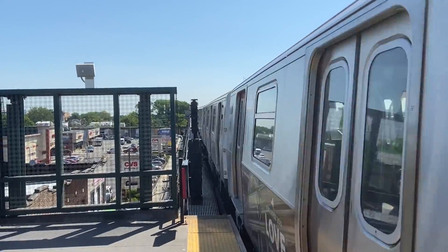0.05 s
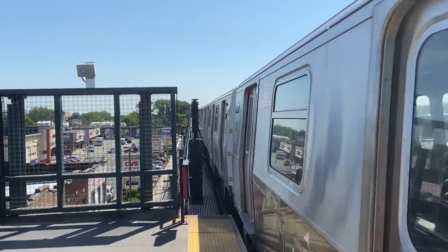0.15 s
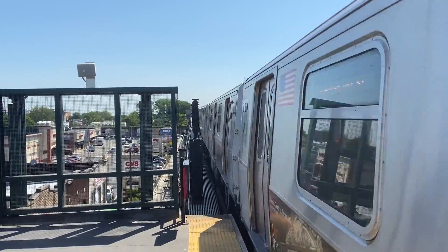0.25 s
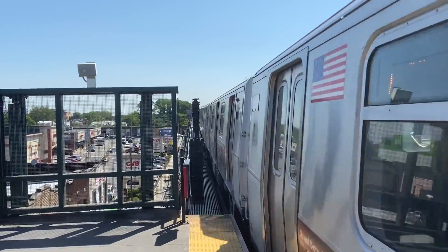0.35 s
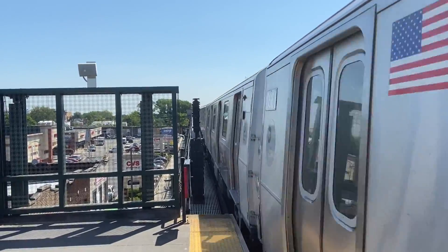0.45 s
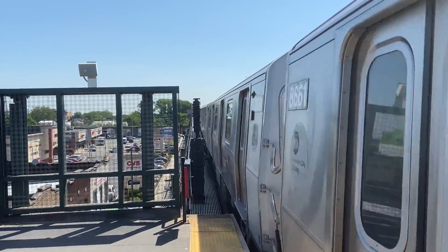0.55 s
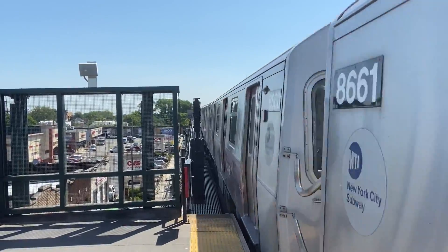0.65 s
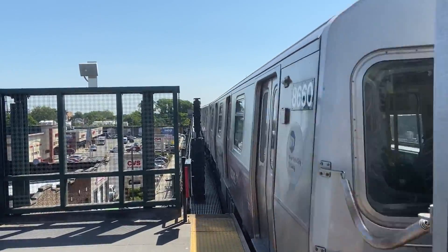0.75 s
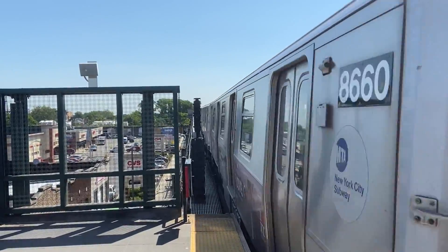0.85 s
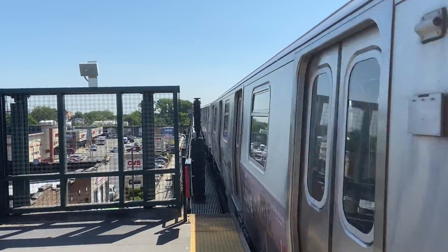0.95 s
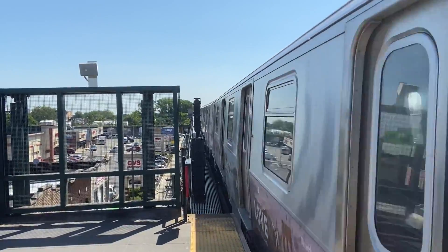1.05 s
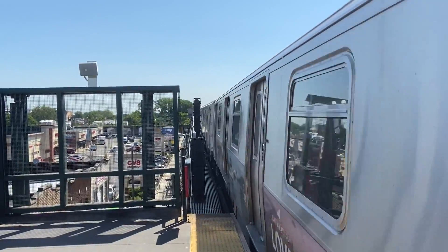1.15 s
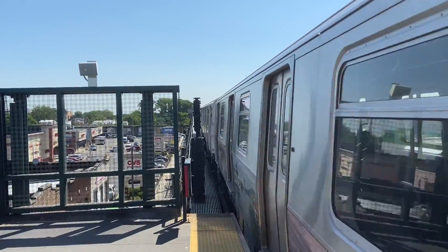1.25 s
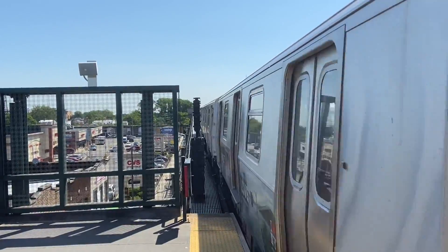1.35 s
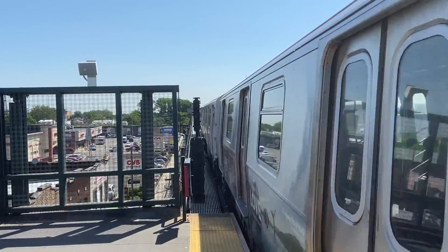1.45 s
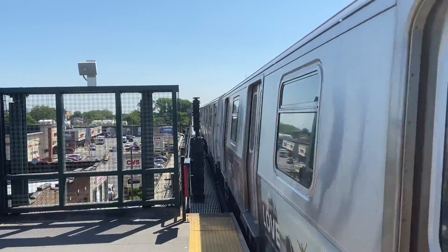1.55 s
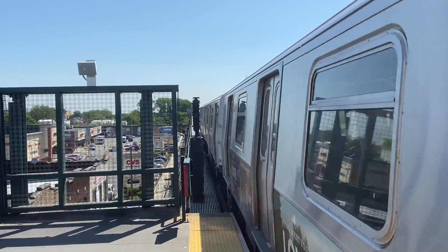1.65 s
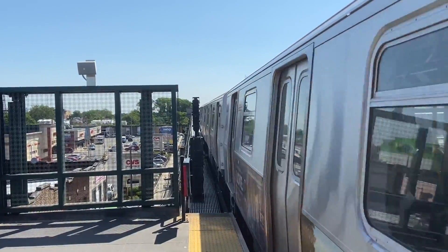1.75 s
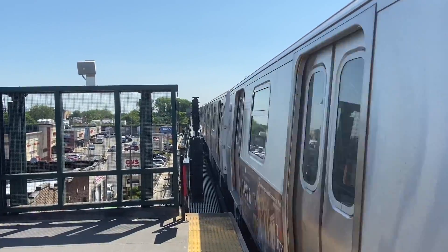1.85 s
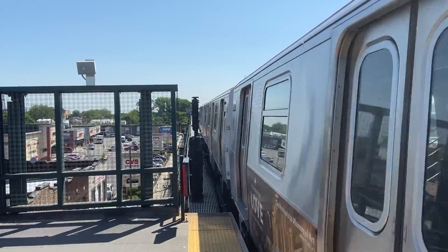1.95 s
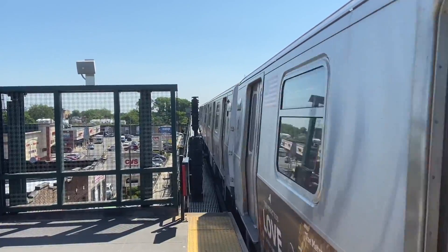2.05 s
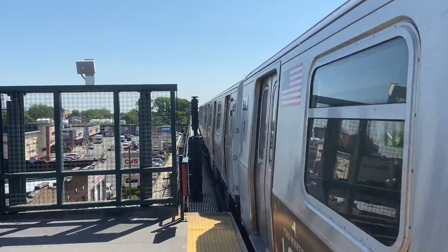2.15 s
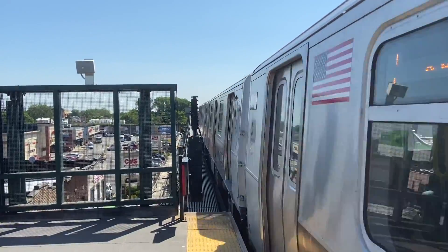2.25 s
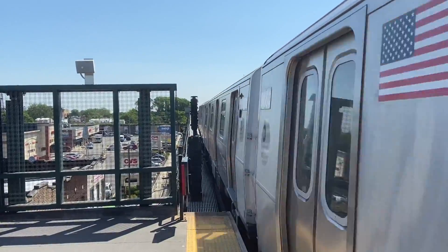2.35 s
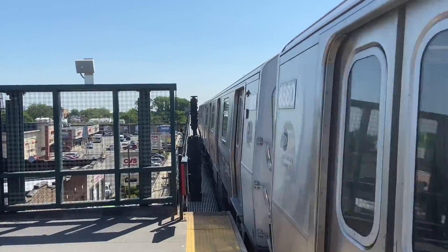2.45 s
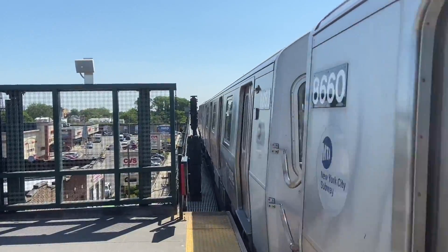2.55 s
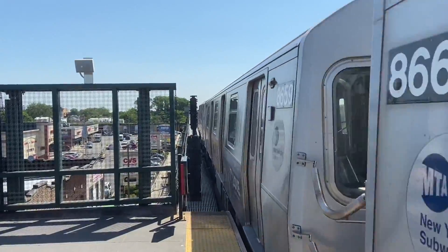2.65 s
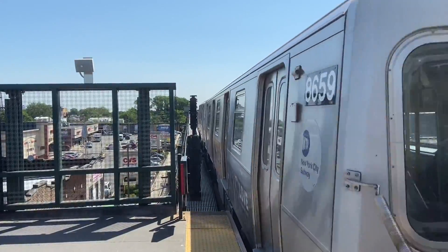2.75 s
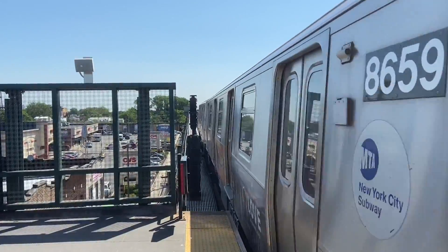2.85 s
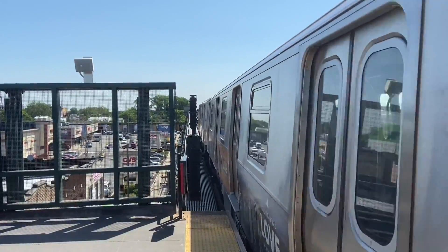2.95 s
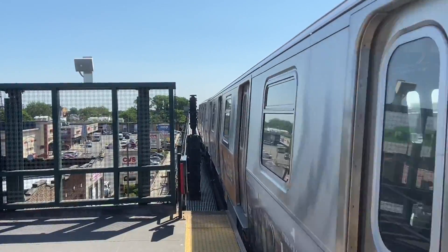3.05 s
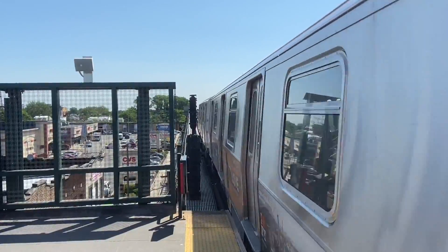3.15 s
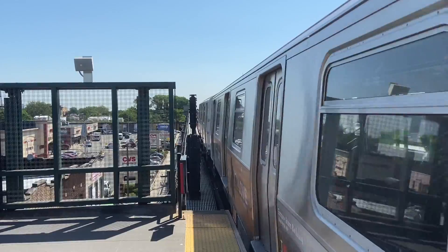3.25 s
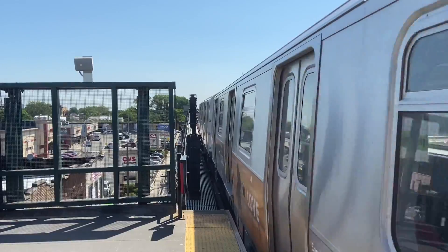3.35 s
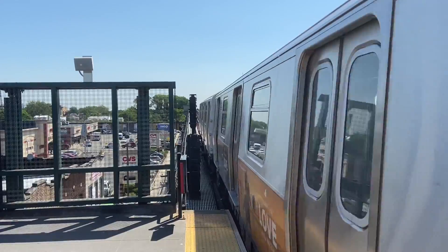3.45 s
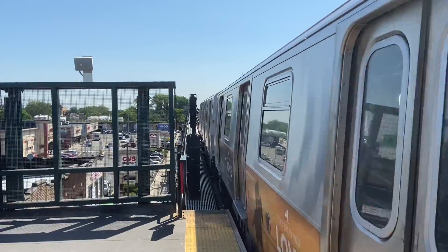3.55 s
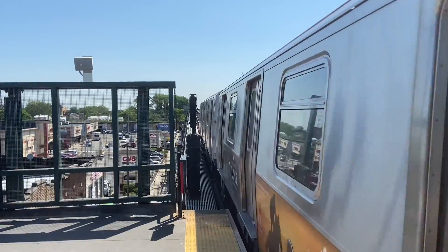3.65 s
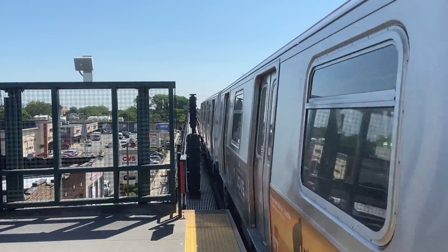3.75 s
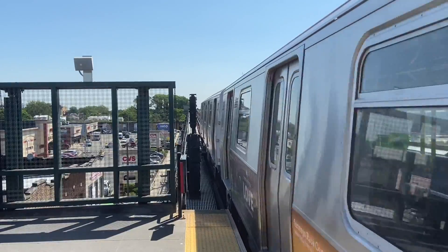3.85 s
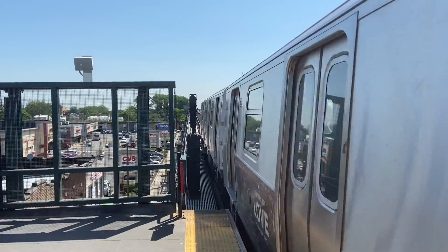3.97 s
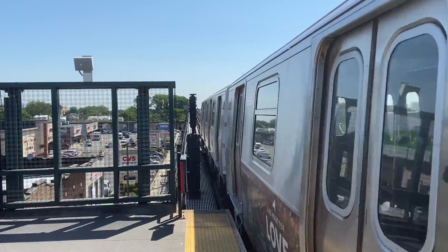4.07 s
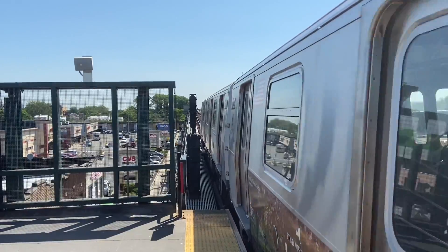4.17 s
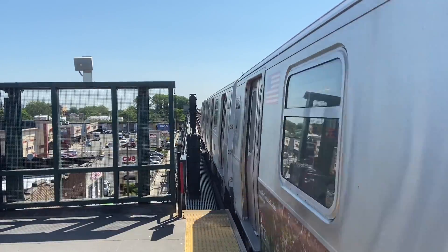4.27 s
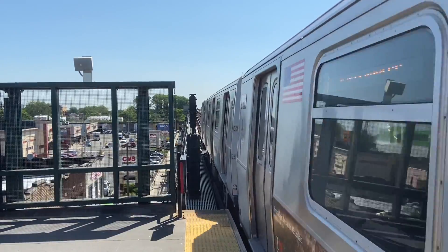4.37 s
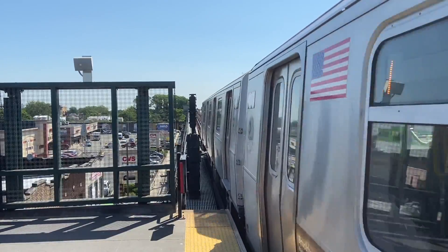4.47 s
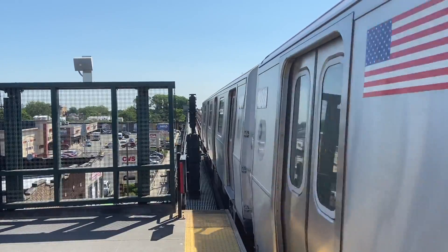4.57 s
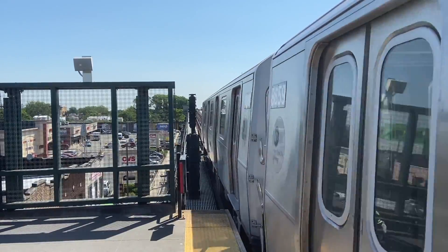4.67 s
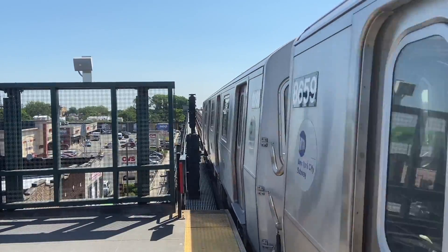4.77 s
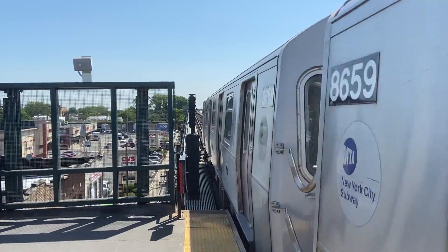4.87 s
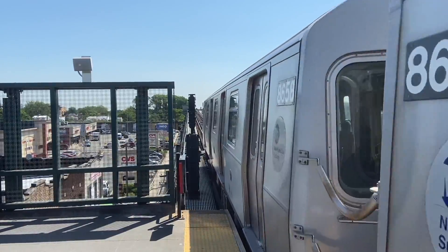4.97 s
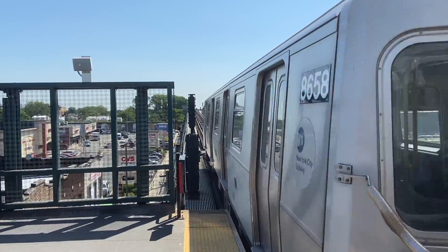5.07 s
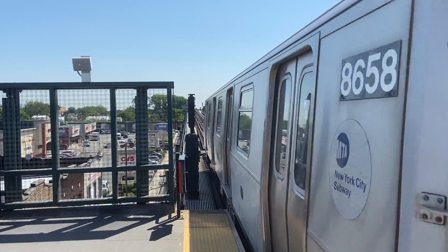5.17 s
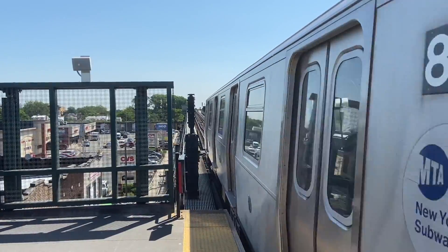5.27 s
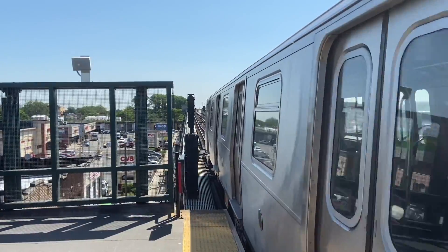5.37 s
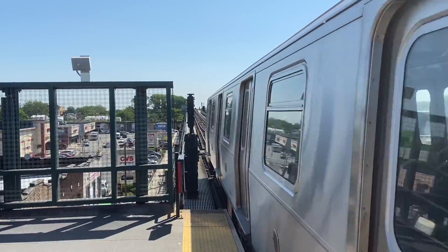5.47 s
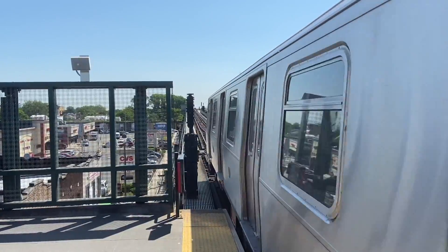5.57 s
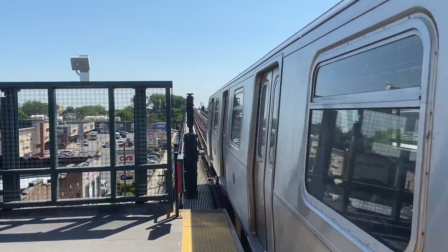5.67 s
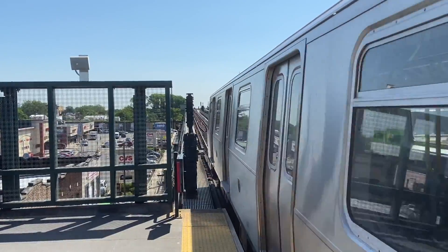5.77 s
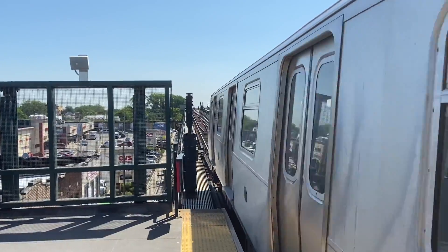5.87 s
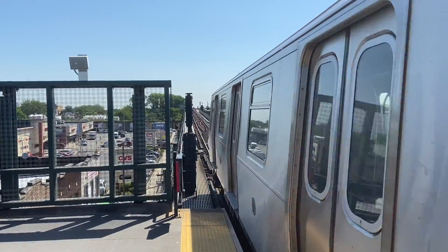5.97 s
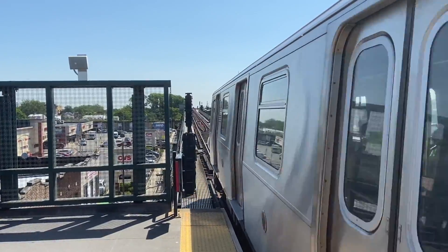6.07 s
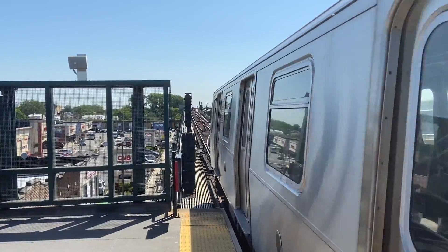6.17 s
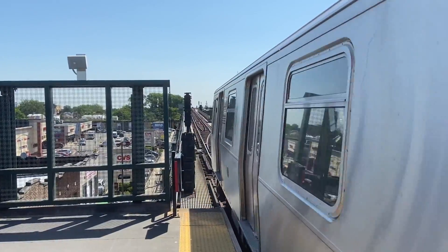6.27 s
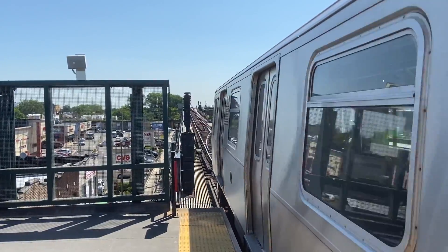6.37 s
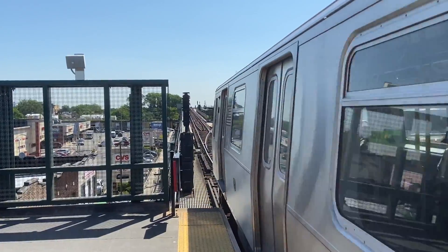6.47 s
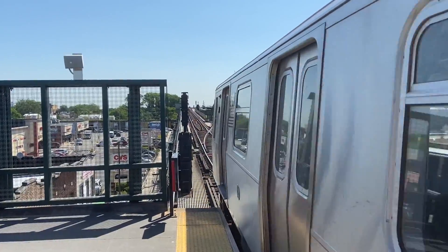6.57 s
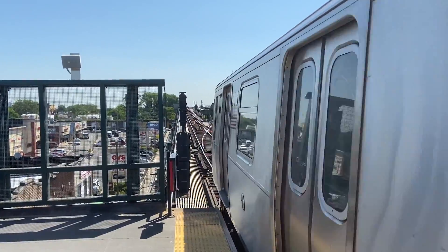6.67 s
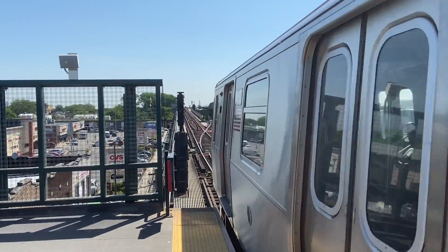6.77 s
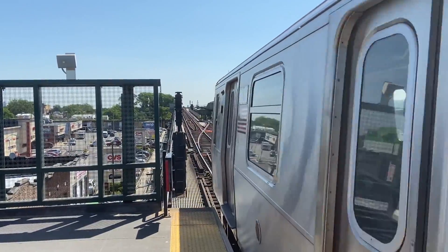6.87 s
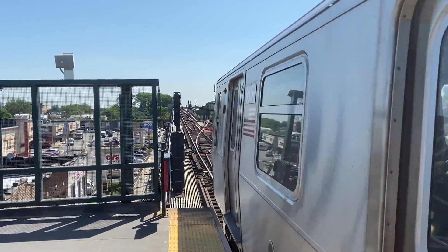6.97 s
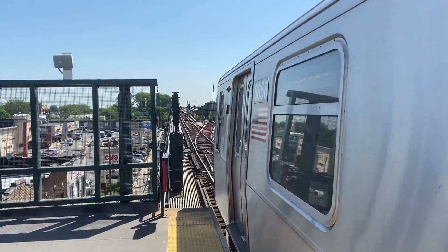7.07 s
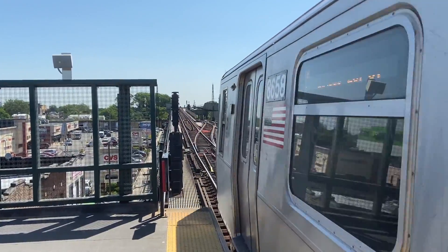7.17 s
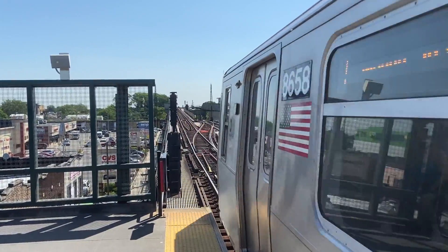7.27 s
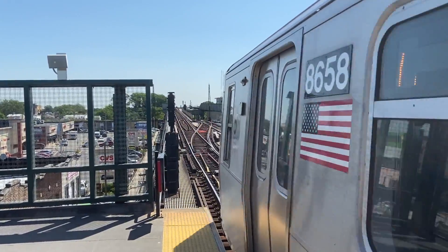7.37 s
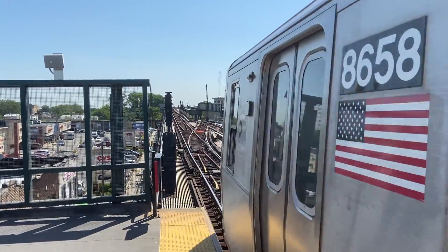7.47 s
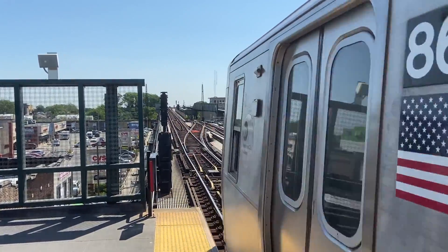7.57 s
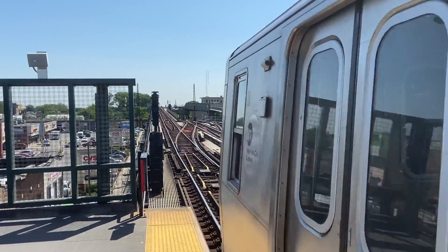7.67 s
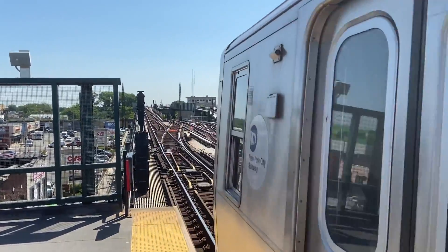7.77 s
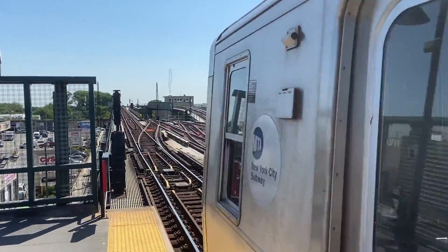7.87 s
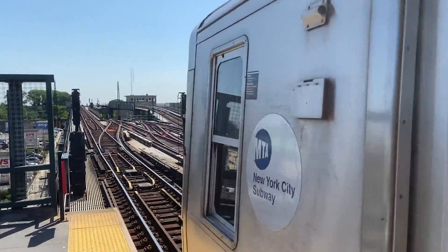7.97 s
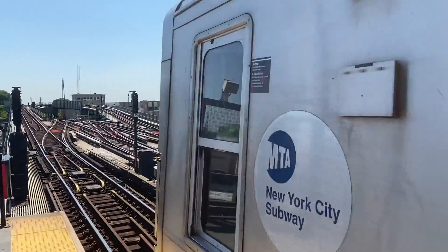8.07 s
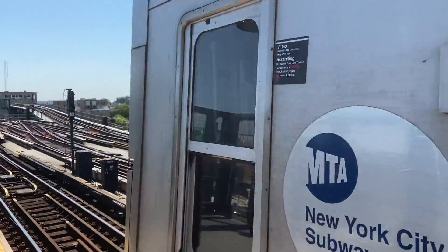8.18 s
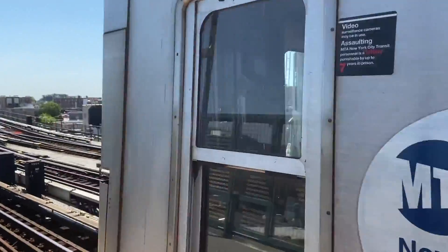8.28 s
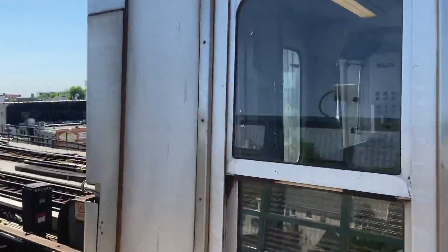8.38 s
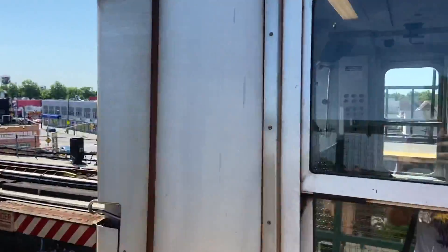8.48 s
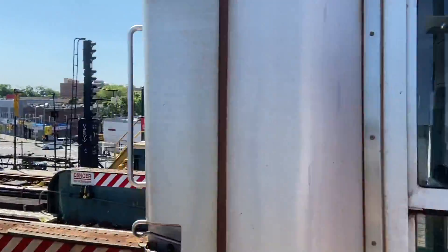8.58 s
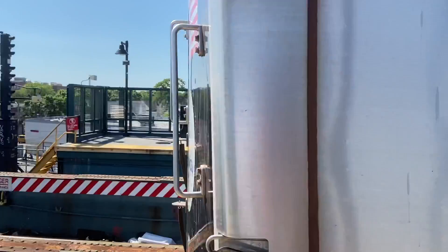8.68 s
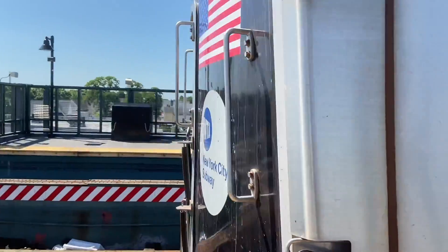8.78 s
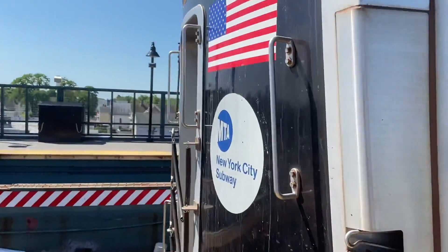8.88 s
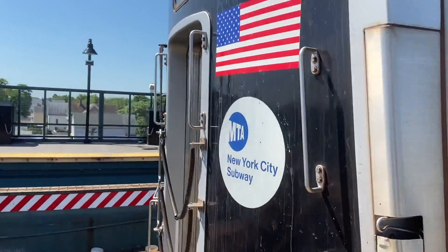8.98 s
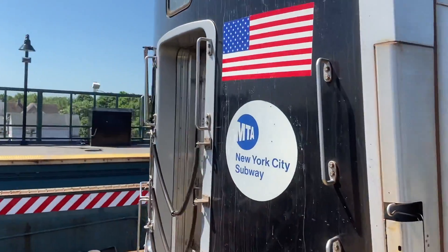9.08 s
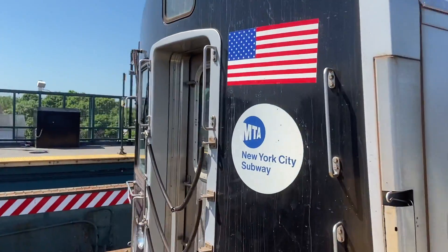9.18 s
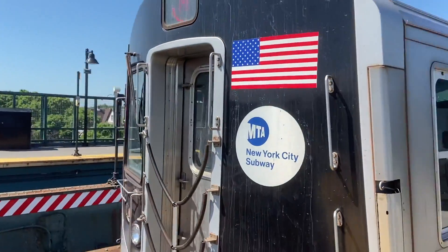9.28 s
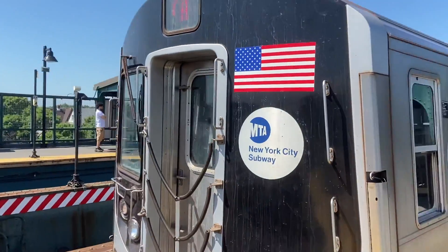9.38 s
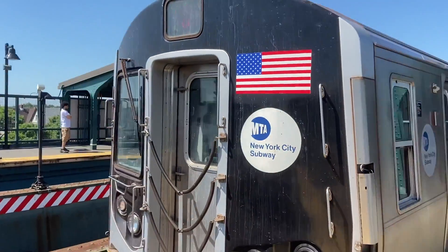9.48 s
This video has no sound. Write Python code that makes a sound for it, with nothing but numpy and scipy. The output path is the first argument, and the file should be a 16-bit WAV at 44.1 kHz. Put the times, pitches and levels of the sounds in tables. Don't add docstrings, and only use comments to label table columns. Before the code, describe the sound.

Close beside an outdoor elevated platform, a long steel train rumbles past. Hard clanking bangs come in irregular clusters over rail joints and switches, shaking the deck and ringing briefly. A fuzzy electric whine shifts between two close pitches. The train slows, bangs grow sparse, and the end is quieter rolling with whine and a faint high brake squeal. Wide stereo, near microphone.

```python
import sys
import numpy as np
from scipy import signal
from scipy.fft import rfft, irfft, next_fast_len
from scipy.io import wavfile
from scipy.ndimage import uniform_filter1d, map_coordinates

SR = 44100
rng = np.random.default_rng(int(sys.argv[2]) if len(sys.argv) > 2 else 0)


def field_ratio(decibels):
    return 10 ** (np.asarray(decibels, dtype=float) / 20)


def master_out(mix):
    frames = np.transpose(np.atleast_2d(mix))
    ceiling = np.clip(frames, -1, 1)
    pcm = np.round(ceiling * 32767).astype(np.int16)
    wavfile.write(sys.argv[1], SR, pcm)


N = 420254

# (time [s], level [dB])
ROLLING_STRENGTH = [(0.0, -23.5), (0.5, -22), (1.38, -25), (2.23, -25), (2.97, -22), (3.24, -27),
                    (4.22, -28), (4.59, -25), (4.91, -27.5), (5.2, -28), (6.18, -33), (7.3, -34),
                    (7.43, -35), (8.73, -33.5), (9.0, -31), (9.53, -32)]
# (frequency [Hz], density [dB per Hz])
DECK_SPECTRUM = [(13, -41), (24, -15), (45, 3), (76, 5), (90, 1), (119, -13), (220, -15.5), (290, -25),
                 (480, -120)]
# (frequency [Hz], density [dB per Hz])
ROAR_SPECTRUM = [(59, -52), (100, 1), (247, -4.5), (293, -2.5), (446, -4.5), (489, -5.5), (565, -10.5),
                 (679, -12), (1330, -22), (2300, -31), (2990, -54), (5060, -120)]
# (frequency [Hz], density [dB per Hz])
HISS_SPECTRUM = [(700, -120), (1200, -13), (2000, 1.5), (3500, -0.5), (5000, -10.5), (8000, -13.5),
                 (11000, -20), (13000, -20.5), (16000, -33)]

# (time [s], peak [dB], deck thump [dB], top edge [dB], decay t60 [s])
NEAR_BLOWS = [(0.3202, -9.5, -19, -14.5, 0.65), (0.7921, -6.5, -23, -12.5, 0.42),
              (1.0031, -10, -22, -13, 0.41), (2.1944, -6, -18.5, -15.5, 0.5),
              (2.4239, -12, -18, -13.5, 0.5), (2.6035, -20.5, -35, -18, 0.37), (2.7327, -5, -21, -12, 0.42),
              (2.9687, -9.5, -26, -14, 0.48), (4.3784, -5, -18, -16, 0.44), (4.6563, -10, -19, -14.5, 0.46),
              (4.8744, -21, -35, -17.5, 0.69), (5.0374, -5, -17.5, -14, 0.37),
              (5.3373, -9, -20, -15.5, 0.5), (6.6543, -21.5, -22.5, -20, 0.93),
              (7.2534, -9, -14, -17.5, 0.51), (7.6685, -9.5, -19, -14, 0.46)]
# (time [s], peak [dB], deck thump [dB], top edge [dB], decay t60 [s])
MIDDLE_BLOWS = [(1.2604, -34, -32, -26, 0.31), (1.523, -17, -32, -10, 0.26), (3.581, -17, -30, -12, 0.25),
                (3.9619, -19.5, -18.5, -17, 0.8), (4.1863, -17.5, -19.5, -9.5, 0.49),
                (6.1267, -21, -23, -11, 0.37)]
# (time [s], peak [dB], deck thump [dB], top edge [dB], decay t60 [s])
FAR_BLOWS = [(0.0207, -12.5, -26, -17, 0.42), (0.1839, -15, -28, -11.5, 0.59),
             (0.4863, -11.5, -18, -17, 0.65), (0.5256, -9, -18.5, -14, 0.39), (0.6778, -15, -32, -17, 0.48),
             (1.3894, -24, -42, -18, 0.82), (1.7436, -14.5, -25, -14, 0.29), (1.8465, -16, -27, -18, 0.84),
             (2.0313, -15.5, -31, -11.5, 0.72), (2.377, -12.5, -23, -19, 0.53), (3.4102, -25, -24, -17, 1),
             (3.753, -25, -40, -17, 1), (3.8386, -14.5, -25, -16, 0.29), (4.2485, -10.5, -34, -25, 0.19),
             (4.5924, -16, -30, -20.5, 0.77), (5.2194, -24, -36, -33, 1.3), (5.6, -27.5, -28, -19, 0.89),
             (5.9214, -26.5, -33, -15.5, 0.83), (6.374, -25.5, -22, -16.5, 0.95),
             (6.4787, -19, -19.5, -20, 0.28), (6.7494, -23, -24, -14, 0.3), (6.9242, -35, -24.5, -11, 3),
             (7.0434, -17, -21, -21, 0.33), (9.1984, -19, -41, -12.5, 0.59)]
BLOWS = NEAR_BLOWS + MIDDLE_BLOWS + FAR_BLOWS
# (frequency [Hz], density [dB per Hz])
BANG_SPECTRUM = [(88, -21), (150, -1), (343, 4.5), (518, -0.5), (810, -9), (1310, -14), (1420, -18),
                 (2150, -19.5), (2450, -17.5), (3650, -24.5), (4670, -21.5), (5790, -29.5), (7800, -27.5),
                 (10100, -60), (17200, -120)]
# (frequency [Hz], gain [dB])
TREBLE_LOSS = [(7800, -9), (11000, -12), (16000, -21.5)]
# (frequency [Hz], level [dB], decay t60 [s])
STEEL_MODES = [(376, -26, 0.68), (448, 7, 0.31), (628, -18, 0.48), (893, -14, 0.31), (1102, -5.5, 0.41),
               (1417, 2, 0.12), (1504, -8, 0.35), (1970, -19, 0.63), (2220, -25, 0.39), (2630, -27, 0.36),
               (2970, -15, 0.25), (3100, -17, 0.42), (3180, -34, 0.38), (3260, -30, 1.1)]
# (frequency [Hz], width [Hz], level [dB])
SWITCH_BLADES = [
    (944, 114, 1.5),
    (4620, 820, -7),
]

# (time [s], level [dB])
WHINE_LEVEL = [(0, -52), (.5, -45), (1, -45.5), (1.9, -50), (2.3, -45), (2.92, -34.5), (3.15, -43),
               (3.95, -51), (4.7, -42), (5.25, -38), (5.5, -42.5), (5.8, -42.5), (6.2, -44), (6.7, -46.5),
               (7, -38), (7.72, -41.5), (8, -44.5), (9.53, -40.5)]
# (start [s], end [s], first pitch [Hz], last pitch [Hz])
LOW_CARRIER_TURNS = [
    (-1, 2.46, 2500, 2435),
    (3.9, 6.235, 2490, 2508),
    (7.82, 11, 2565, 2566),
]
# (multiple [ratio], level [dB], scatter [Hz])
CARRIER_OVERTONES = [(1.5, -24, 50), (2, -23, 110), (3, -34, 70), (4, -35, 90)]
# (time [s], level [dB])
OVERTONE_LEVEL = [(0, -12), (5, -22), (6.2, -2), (7.9, -8), (8.2, 5), (9.53, 6.5)]

# (time [s], frequency [Hz], level [dB])
GEAR_MESH = [
    (7.6, 3220, -95),
    (7.9, 3195, -67),
    (9.2, 3014, -66),
    (9.53, 2970, -67),
]
# (time [s], frequency [Hz], level [dB])
MOTOR_MOAN = [
    (7.8, 645, -72),
    (7.95, 645, -56),
    (8.3, 635, -56),
    (8.5, 630, -72),
]
# (time [s], frequency [Hz], level [dB])
FLANGE_CHIRP = [
    (7.98, 1900, -85),
    (8.01, 1900, -54),
    (8.06, 1900, -58),
    (8.1, 1900, -85),
]
# (time [s], frequency [Hz], level [dB])
BRAKE_SQUEAL = [
    (8.3, 7670, -85),
    (8.7, 7670, -67),
    (9.1, 7670, -64),
    (9.53, 7670, -63),
]

# (frequency [Hz], coherence [0..1])
LIKENESS = [(40, .988), (300, .89), (700, .71), (1500, .69), (3000, .45), (5500, .48), (6800, .9),
            (15000, .9)]
# (frequency [Hz], lead [half turns])
PHASE_LEAD = [(0, 0), (1380, -.1), (1720, -.3), (3100, .13), (6400, .04), (7500, -.04), (8300, -.9),
              (9600, -1.1), (10500, -1.93), (11700, -2.07), (12500, -2.94), (13900, -3.06), (14600, -3.94),
              (16000, -4.04)]
# (frequency [Hz], difference [dB])
LEVEL_LEAN = [(60, -0.5), (200, 1), (380, -1), (700, -1), (1290, -2), (2380, 3), (4400, 2), (6500, 3),
              (15000, -2)]


def unit(x):
    return x / np.sqrt(np.mean(x ** 2) + 1e-20)


def along(points, hz):
    f, v = np.transpose(points)
    return np.interp(np.log(hz + 1), np.log(f + 1), v)


def curves(rows):
    s, *cols = np.transpose(rows)
    return [np.interp(np.arange(N) / SR, s, c) for c in cols]


def wobble(rate, order=3):
    knots = rng.standard_normal(int(N * rate / SR) + 4)
    return map_coordinates(knots, [np.arange(N) * rate / SR], order=order)


def filtered(x, response):
    m = next_fast_len(N + 8192)
    return irfft(rfft(x, m) * response(np.fft.rfftfreq(m, 1 / SR)), m)[..., :N]


def rush(gain, patchy_db, size=512):
    z = signal.stft(rng.standard_normal((2, N + size)), nperseg=size)[2]
    field = uniform_filter1d(rng.standard_normal(z.shape[1:]), size=3, axis=0)
    field = uniform_filter1d(field, size=6, axis=1)
    noise = signal.istft(z * field_ratio(patchy_db * unit(field)), nperseg=size)[1][:, :N]
    return unit(filtered(noise, gain))


def after_blows(level_db, rise_s, t60_s):
    t, power = np.arange(SR) / SR, np.zeros(N + SR)
    shape = (1 - np.exp(-(t / rise_s) ** 2)) * field_ratio(-60 * t / t60_s)
    for (s, *_), db in zip(BLOWS, level_db):
        power[round(s * SR):][:SR] += (field_ratio(db) * shape) ** 2
    return power[:N]


def rolling():
    strength_db, = curves(ROLLING_STRENGTH)
    mean_db = strength_db.mean()
    change_db = strength_db - mean_db
    _, peak_db, thump_db, edge_db, _ = np.transpose(BLOWS)
    drum_power = field_ratio(mean_db - 1 + 0.81 * change_db + 2.4 * wobble(5)) ** 2
    drum = np.sqrt(drum_power + after_blows(thump_db + 3, rise_s=0.015, t60_s=0.57))
    sing_power = field_ratio(mean_db - 16.5 + 0.91 * change_db) ** 2
    sing = np.sqrt(sing_power + after_blows(peak_db + edge_db - 5, rise_s=0.01, t60_s=0.52))
    shudder = wobble(9.9)
    deck = drum * rush(lambda f: field_ratio(along(DECK_SPECTRUM, f)), patchy_db=-0.15)
    roar_noise = rush(lambda f: field_ratio(along(ROAR_SPECTRUM, f)), patchy_db=1.05, size=2048)
    roar = field_ratio(strength_db - 0.5 + 0.58 * shudder) * roar_noise
    hiss = sing * field_ratio(0.37 * shudder) * rush(lambda f: field_ratio(along(HISS_SPECTRUM, f)), patchy_db=3.5)
    return deck + roar + hiss


def struck_steel():
    t = np.arange(SR) / SR
    t_ring = t[:SR // 2]
    power, ring = np.zeros((4, N + SR)), np.zeros((2, N + SR))
    hz, mode_db, mode_t60 = np.transpose(STEEL_MODES)[..., None]
    chance = rng.standard_normal((len(BLOWS), 4, len(STEEL_MODES), 1))
    counts = [len(NEAR_BLOWS), len(MIDDLE_BLOWS), len(FAR_BLOWS)]
    rises_s = np.repeat([.0044, .0095, .019], counts)
    crack = field_ratio(-60 * t / .11) * np.array([[.3], [.7], [1.3]])
    for (s, db, _, edge_db, t60), rise, (size, detune, *turn) in zip(BLOWS, rises_s, chance):
        at = max(round((s - .9 * rise - .001) * SR), 0)
        far = np.clip((-12 - db) / 5, 0, 1)
        boom_db = min(db - 1.24, -12)
        level = np.array([[boom_db - 3.0], [db - 7], [db + edge_db - 6.5]])
        swell = 1 - np.exp(-(t / (rise * np.array([[2.2], [1.1], [1.05]]))) ** 2)
        fall = field_ratio(-60 * t / (t60 * np.array([[1.15], [.95], [.85]])))
        shake = field_ratio(level) * swell * (fall + crack)
        power[:, at:at + SR] += np.array([*shake, far * field_ratio(-7.5) * shake[1]]) ** 2
        strike_db = 4 * np.tanh(size) - 60 * t_ring / np.clip(mode_t60, .08, .3)
        shape = field_ratio(db - 16.0 + mode_db + strike_db) * swell[1, :SR // 2]
        angle = 2 * np.pi * hz * (1 + 0.0267 * detune) * t_ring
        for side, phase in zip(ring, turn):
            side[at:at + SR // 2] += np.sum(shape * np.sin(angle + 9 * phase), axis=0)
    return power[:, :N], ring[:, :N]


def blows():
    power, ring = struck_steel()
    rattle = field_ratio(1.6 * wobble(220) + 1.4 * wobble(70) + .5 * wobble(25))

    def colour(f):
        return field_ratio(along(BANG_SPECTRUM[:-2], f) + along(TREBLE_LOSS, f))

    def low(f):
        return 1 / (1 + (f / 800) ** 4)

    def high(f):
        return 1 / (1 + (4000 / (f + 1)) ** 4)

    def middle(f):
        return np.abs(1 - low(f) - high(f))

    def blades(f):
        return sum(field_ratio(db) * f * w / np.abs(c * c - f * f + 1j * f * w) for c, w, db in SWITCH_BLADES) ** 2

    parts = []
    for p, share in zip(power, (low, middle, high)):
        noise = rush(lambda f: colour(f) * np.sqrt(share(f)), patchy_db=2.5, size=1024)
        parts.append(np.sqrt(p) * noise)
    parts.append(np.sqrt(power[3]) * rush(blades, patchy_db=4.5))
    return unit(rattle) * sum(parts) + ring


def tone(hz, scatter_hz, rate):
    return 2 * np.pi * np.cumsum(hz + scatter_hz * np.tanh(1.2 * wobble(rate, order=1))) / SR


def chorus(hz, scatter_hz, count):
    voices = 0
    for _ in range(count):
        voices = voices + np.sin(tone(hz, scatter_hz, rate=100) + rng.uniform(0, 2 * np.pi, (2, 1)))
    return unit(voices)


def whine():
    t = np.arange(N) / SR
    level_db, = curves(WHINE_LEVEL)
    bite_db, = curves(OVERTONE_LEVEL)
    pitch = [point for a, b, first, last in LOW_CARRIER_TURNS for point in ((a, first), (b, last))]
    low_hz, = curves(pitch)

    def step(s):
        return .5 + .5 * np.tanh((t - s) / .04)

    turn = sum(step(a) - step(b) for a, b, *_ in LOW_CARRIER_TURNS)
    low_db = level_db - 26 * (1 - turn) ** 3
    high_db = level_db - 26 * turn ** 3
    scatter_hz = 122 - .72 * t ** 2
    low = chorus(low_hz, scatter_hz, count=5)
    for multiple, db, spread in CARRIER_OVERTONES:
        low = low + field_ratio(bite_db + db) * chorus(multiple * low_hz, spread, count=2)
    high = chorus(2880, scatter_hz, count=5)
    return field_ratio(low_db + 0.4 * wobble(18)) * low + field_ratio(high_db) * high


def thin_line(rows, scatter_hz):
    hz, db = curves(rows)
    phase = tone(hz, scatter_hz, rate=18)
    return field_ratio(db + 6.5 + 2.05 * wobble(9.1)) * np.array([np.sin(phase), np.cos(phase)])


def thin_lines():
    gear = thin_line(GEAR_MESH, scatter_hz=22.0)
    moan = thin_line(MOTOR_MOAN, scatter_hz=12.5)
    chirp = thin_line(FLANGE_CHIRP, scatter_hz=11.4)
    squeal = thin_line(BRAKE_SQUEAL, scatter_hz=11.6)
    return gear + moan + chirp + squeal


def scene():
    return rolling() + blows() + whine() + thin_lines()


def band_limit(x):
    return signal.sosfilt(signal.butter(12, 16800, fs=SR, output="sos"), x)


def record(dry):
    def angle(f):
        return np.arccos(np.clip(along(LIKENESS, f), 0, 1)) / 2

    def left(f):
        lead = np.exp(.5j * np.pi * along(PHASE_LEAD, f))
        return lead * field_ratio(along(LEVEL_LEAN, f) / 2) / (1 + (30 / (f + 1)) ** 4)

    def right(f):
        return np.conj(left(f)) / field_ratio(along(LEVEL_LEAN, f))

    direct, scattered = filtered(dry, lambda f: np.array([np.cos(angle(f)), np.sin(angle(f))]))
    ports = np.array([direct + scattered, direct - scattered])
    x = filtered(ports, lambda f: np.array([left(f), right(f)]))
    x = x / (1 + np.abs(x / .95) ** 4) ** .25
    mix = filtered(x, lambda f: f < 15850)
    return band_limit(mix)


dry = scene()
out = record(dry)
master_out(out)
```